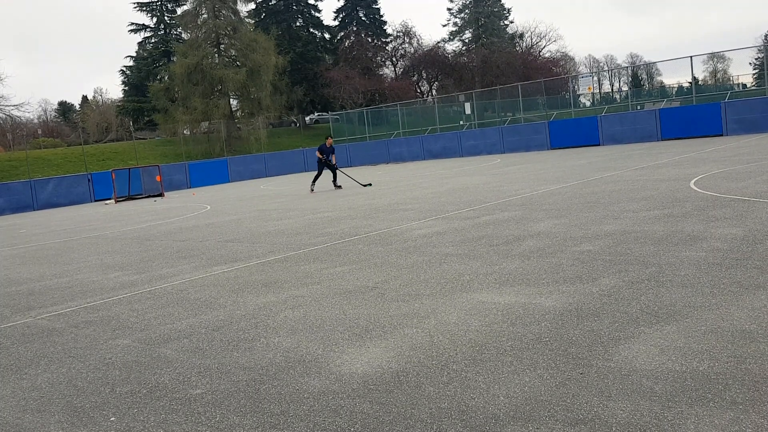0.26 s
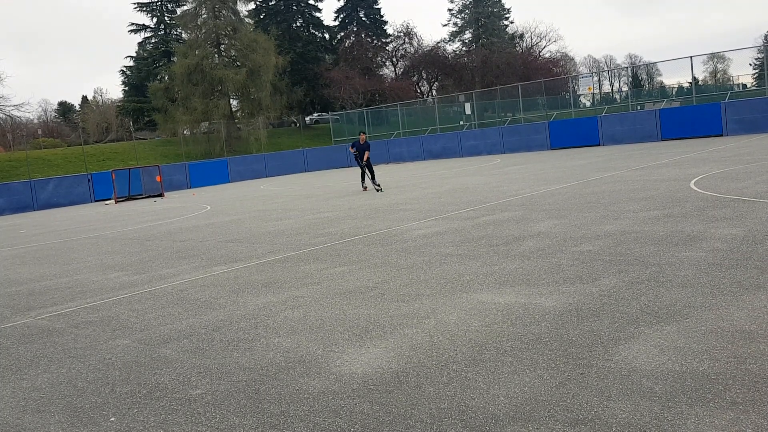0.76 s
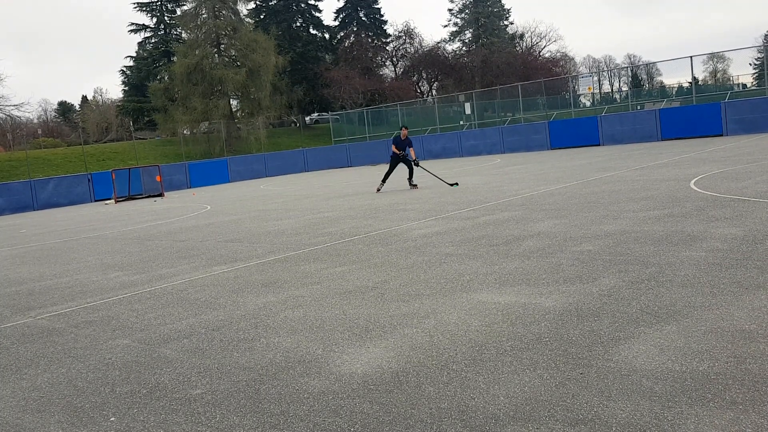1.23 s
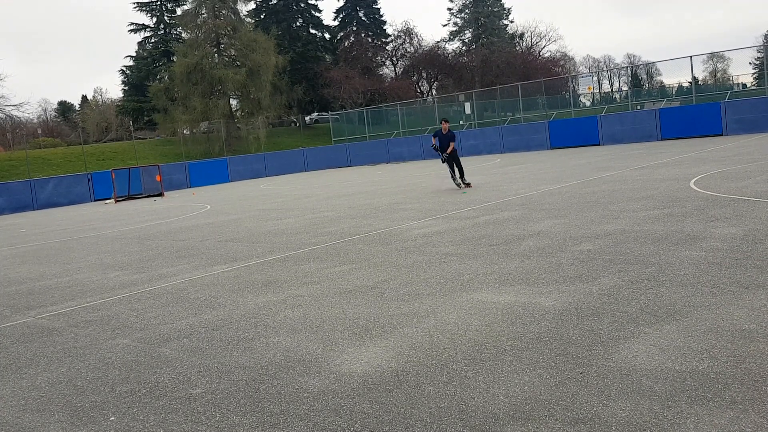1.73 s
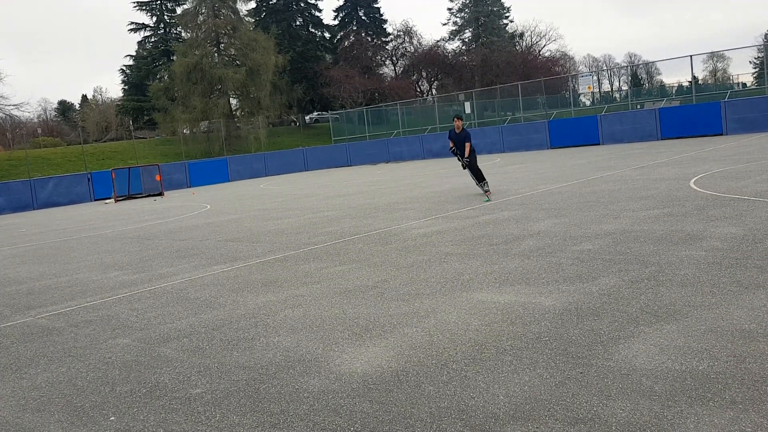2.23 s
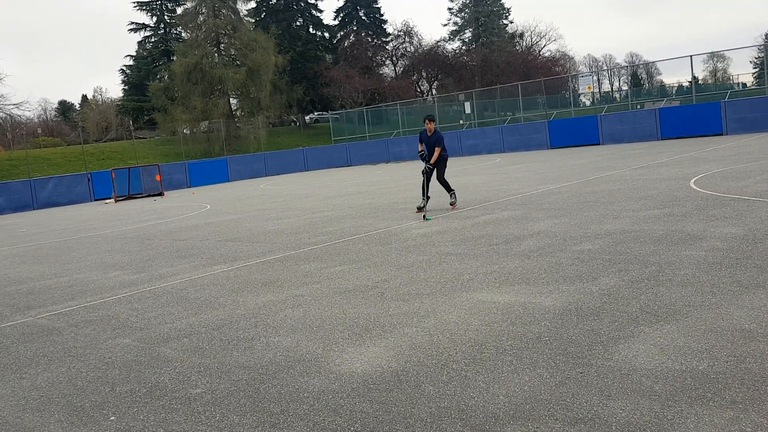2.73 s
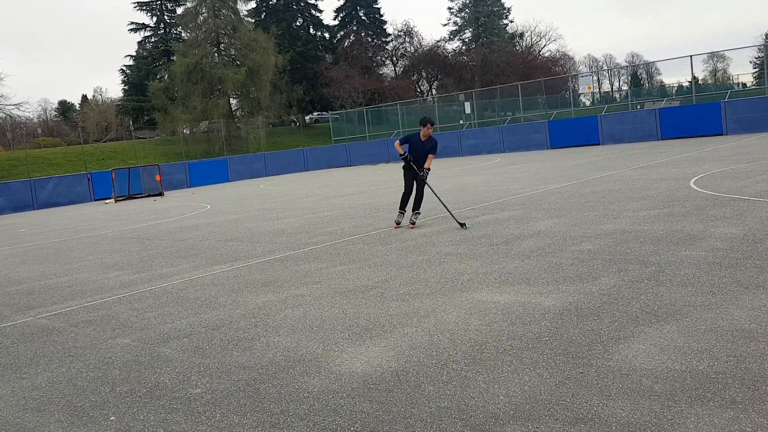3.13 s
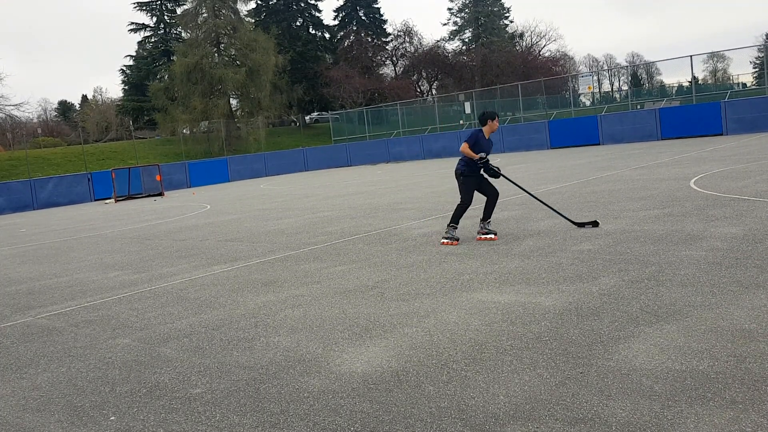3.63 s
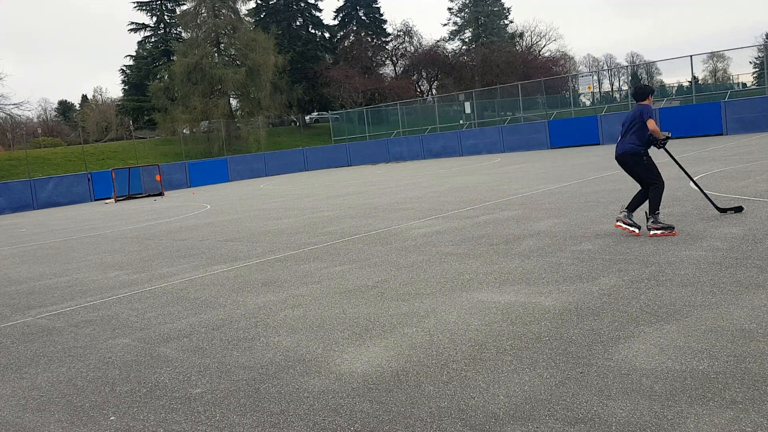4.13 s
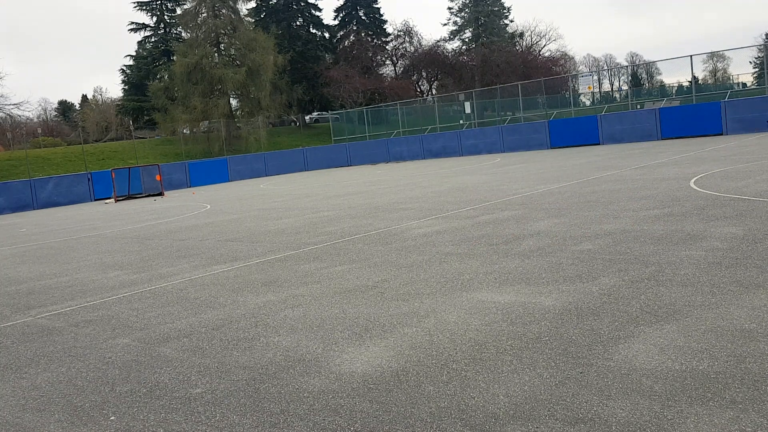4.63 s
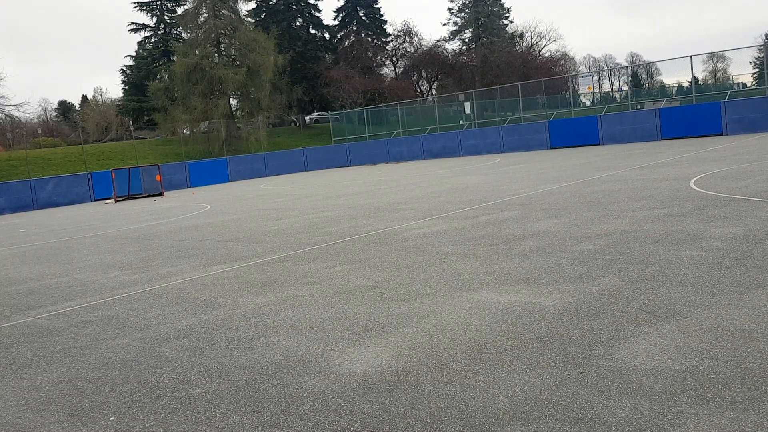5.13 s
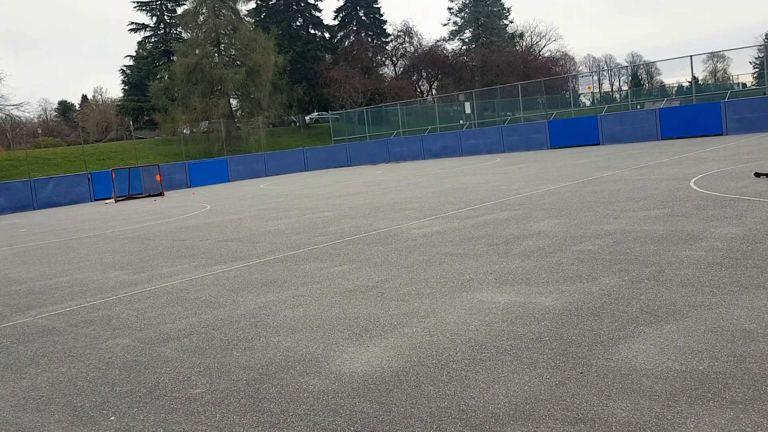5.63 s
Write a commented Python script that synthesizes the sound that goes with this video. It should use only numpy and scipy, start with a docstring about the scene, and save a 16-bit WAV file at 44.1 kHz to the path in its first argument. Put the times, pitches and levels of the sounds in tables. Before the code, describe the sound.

A stationary stereo microphone at an open-air asphalt rink. From 0 to about 1.6 seconds strong wind dominates: low, uneven rumbling and fluttering thumps, different in each ear, sometimes overloading, with small dry ticks on the case. Faint skate strokes scrape behind it, with light knocks and gritty crunches around 1.4 to 1.6. The wind falls back, gusts again more on the right near 2.1, then weakens after 2.4. A dull knock lands near 2.7. From 3 the wheels emerge: grainy roar, airy hiss and scraping pushes, swelling from 3.2 and ringing over coarse stones, brightest around 3.9 to 4.2, with a thin quick rattle as they swing right. They roll on at the right, with lighter wind puffs. Knocks begin near 5.4; a hard, sharp clack with crunchy rattle hits at 5.6, smaller knocks follow to 5.8. A faint distant rush continues throughout, and boards answer the knocks briefly.

```python
"""Outdoor asphalt rink: a hockey player on inline skates curves past a camera on its right.
Wheels roar, ring, scrape and hiss as noise of stone impacts; taps on one narrow mode make a thin rattle.
Skates and stick knock on the ground as damped modes; noise bursts make crunches and the hardest knock's rattle.
The boards answer faintly. Wind buffets both microphone ports as shaped noise and thumps; light ticks,
perhaps drizzle, ring the case. A steady distant rush of trees and town lies behind."""
import sys
import numpy as np
from scipy import signal
from scipy.fft import rfft, irfft, next_fast_len
from scipy.io import wavfile
from scipy.ndimage import uniform_filter1d, map_coordinates

SR = 44100
rng = np.random.default_rng(int(sys.argv[2]) if len(sys.argv) > 2 else 0)


def to_wav(s):
    """Save 16-bit WAV."""
    ch = np.atleast_2d(s).T  # columns
    pcm = np.round(np.clip(ch, -1, 1) * 32767)  # PCM
    wavfile.write(sys.argv[1], SR, pcm.astype(np.int16))


N = 259160

# Skater's path. Each row: time in seconds, bearing in degrees to the right, distance in metres.
SKATER_PATH = [(0, -9, 5.8), (1.3, 5.5, 6.9), (2.1, 20.5, 6.3), (2.8, 8, 4.3), (3.45, 7.5, 3.2),
               (3.85, 17, 5.2), (4.02, 31, 4.1), (4.3, 48.5, 4.4), (4.6, 62, 4.8), (5.25, 81, 5.1),
               (5.55, 63, 3.9), (5.88, 67, 7.1)]
# Dull roar of wheels on asphalt, also the dull part of a crunch. Each row: Hz, relative density in dB.
ROAR_SPECTRUM = [(100, -39), (300, -1.5), (550, 2), (900, -0.5), (1350, 2), (1800, -1.5), (2500, -1.5),
                 (3100, -14), (4200, -17), (9000, -31.5)]
# Modes of the camera's case. Each row: nominal Hz, relative level in dB, t60 in seconds.
CASE_MODES = [(2720, -3.5, .012), (3750, -9, .026), (4740, -8, .014), (5270, -9, .012), (7610, -8, .012),
              (8500, -5, .008), (8850, -4, .009), (11900, -9, .004), (12750, -4, .006)]


def wheels():
    """The ring swells and jolts on its own curve, sideways pushes scrape, load and scrape feed the roar."""
    # Level of the fine hiss. Each row: time in seconds, level in dB.
    hiss_level = [(0, -70), (1.3, -68.5), (1.55, -55), (1.8, -68), (2.86, -65), (3.0, -57.5), (3.6, -55),
                  (4.3, -55.5), (4.65, -61.5), (5.3, -61.5), (5.88, -67)]
    # Brief swells of the hiss as the skater goes by. Each row: centre in seconds, level in dB.
    hiss_swells = [(2.68, -69), (3.08, -49), (3.57, -49.5), (3.77, -53), (4.39, -53.5), (4.5, -55),
                   (4.76, -52.5), (5.08, -56.5)]
    # Level of the wheels' ring. Each row: time in seconds, level in dB before the distance loss.
    ring_level = [(0, -48), (1.35, -54), (1.5, -48), (2.05, -54), (2.2, -50.5), (3.15, -54.5),
                  (3.35, -44.5), (3.58, -39.5), (3.66, -48.5), (3.75, -38.5), (3.92, -40.5), (4.0, -50.5),
                  (4.22, -44.5), (4.3, -55.5), (4.58, -57), (4.66, -61), (5.88, -56)]
    # Coarse stones jolt the wheels into ringing. Each row: centre in seconds, level in dB before the distance loss.
    stone_jolts = [(3.449, -35), (3.557, -38), (3.595, -37), (3.743, -46), (3.898, -30.5), (3.94, -37),
                   (4.097, -29), (4.165, -37), (4.245, -41.5), (4.335, -46), (4.525, -45), (4.915, -45),
                   (5.03, -54), (5.14, -41)]
    # Spectra. Each row: Hz, relative density in dB.
    ring_spectrum = [(900, -26), (1450, -11), (1780, -3.5), (2100, 3), (2300, 1), (2480, -6), (2700, -17),
                     (3400, -28), (6000, -42)]
    scrape_spectrum = [(800, -49), (2400, 5), (3200, 2), (3900, -0.5), (5000, -4.5), (6500, -9),
                       (8500, -17), (10500, -44), (15000, -47)]
    hiss_spectrum = [(3000, -16), (6000, -3.5), (8000, -9.5), (10000, -10), (12600, -2), (14500, -11),
                     (16000, -15)]
    roar_db, scrape_db = -42.5, -57.5  # free gliding, at the reference distance
    loss_db_per_doubling = 5
    roar_from_load, roar_from_slide = 0.34, 0.26
    slip_spread_db, slip_rate_hz = 3, 86
    jolt_width_s, swell_width_s = 0.0069, 0.046

    load, slide = effort()
    slide = slide * amp(slip_spread_db * wobble(slip_rate_hz) - 2.0)  # a pushing skate grips and slips
    uneven_db = 1.9 * wobble(80) + .9 * wobble(14)  # the wheels bear unevenly on the ground

    drive = np.hypot(roar_from_load * load, roar_from_slide * slide)
    roar_grit = grit(ROAR_SPECTRUM, rate_hz=700, size_db=4, smooth=0.89, scattered_db=-1.5)
    roar = amp(roar_db) * np.hypot(1, drive) * roar_grit

    scrape_grit = grit(scrape_spectrum, rate_hz=1400, size_db=3.5, smooth=0.8, scattered_db=-1.5)
    scrape = amp(scrape_db) * np.hypot(1, slide) * scrape_grit

    ring_db, = curves(ring_level)
    jolts = sum(amp(db) * bump(s, jolt_width_s) for s, db in stone_jolts)
    ring_grit = grit(ring_spectrum, rate_hz=970, size_db=0.0, smooth=0.68, scattered_db=4.5)
    ring = np.hypot(amp(ring_db), jolts) * ring_grit * tilt(1.7)

    hiss_db, = curves(hiss_level)
    swells = sum(amp(db) * bump(s, swell_width_s) for s, db in hiss_swells)
    hiss_grit = grit(hiss_spectrum, rate_hz=2600, size_db=4.5, smooth=1.1, scattered_db=-2)
    hiss = np.hypot(amp(hiss_db), swells) * hiss_grit

    rolling = amp(uneven_db) * (roar + scrape) + amp(0.3 * uneven_db) * ring
    return amp(-loss_db_per_doubling * doublings()) * rolling + amp(0.52 * uneven_db) * hiss


def effort():
    """Each stroke builds, holds and lets go; gives the load and the sideways scrape."""
    # Strides and turns. Each row: start in seconds, length in seconds, load on the wheels in dB,
    # sideways scrape in dB, both as pushed before slip and sharing and relative to free gliding.
    strokes = [(0.224, 0.305, 4, 11), (0.83, 0.13, -10, 4.5), (1.368, 0.29, 14, 13),
               (1.648, 0.25, 10.5, 7.5), (1.87, 0.2, 13, 10), (2.61, 0.15, 10.5, 2), (3.185, 0.43, 7, 7),
               (3.618, 0.29, 11, 7), (4.048, 0.17, 4, 4), (4.447, 0.092, 13.5, -6), (4.85, 0.17, 6, -10),
               (5.482, 0.12, -3, 12), (5.595, 0.096, -3, 11), (5.684, 0.2, -1, 13)]
    build_share, release_s = 0.36, 0.041  # build-up as a share of the length
    t = np.arange(N) / SR
    load, slide = np.zeros((2, N))
    for s, length_s, load_db, slide_db in strokes:
        build = np.clip((t - s) / (build_share * length_s), 0, 1)
        release = np.clip(1 - (t - s - length_s) / release_s, 0, 1)
        load += amp(load_db) * build * release
        slide += amp(slide_db) * build * release
    return load, slide


def grit(spectrum, rate_hz, size_db, smooth, scattered_db):
    """Rolling noise of two skates: stone impacts on a smooth bed, direct and scattered by ground and boards."""
    stance_m = 0.28  # each skate from the skater's centre line
    shape = (4, N)  # two direct skates, two scattered ports
    sizes = amp(np.clip(size_db * rng.standard_normal(shape), -12, 12))
    hits = (rng.random(shape) < rate_hz / SR) * rng.standard_normal(shape) * sizes
    paths = coloured(unit(hits) + smooth * rng.standard_normal(shape), spectrum)
    direct = (at_ports(paths[0], -stance_m) + at_ports(paths[1], stance_m)) / np.sqrt(2)
    _, distance_m = curves(SKATER_PATH)
    # the nearer the skater, the more the direct path wins
    scattered = amp(scattered_db) * np.minimum(distance_m / 6.63, 1) ** 1.9
    return (direct + scattered * paths[2:]) / np.sqrt(1 + scattered ** 2)


def chatter():
    """Quick, uneven taps on one narrow mode make a thin rattle that carries only from near; some stand out."""
    # The clearer taps. Each row: time in seconds (each starts 2 ms earlier), level in dB before the tap gain.
    clear_taps = [(3.951, -38), (3.961, -41), (4.028, -42), (4.049, -43), (4.078, -50), (4.096, -35),
                  (4.129, -41), (4.164, -49), (4.182, -44), (4.212, -41), (4.223, -45), (4.274, -40),
                  (4.556, -47), (4.662, -47), (4.817, -50), (4.829, -52), (4.897, -44), (4.967, -47),
                  (5.052, -50), (5.123, -48)]
    mode_hz, t60_s, taps_per_s = 3720, .022, 70
    flutter_db, loss_db_per_doubling = -64, 12  # level at the reference distance
    tap_gain_db, offset_m = 4.5, .01
    t = np.arange(SR // 10) / SR
    ring = amp(-60 * t / t60_s) * np.sin(2 * np.pi * mode_hz * t) * (1 - np.exp(-t / 0.00066))
    taps = (rng.random(N) < taps_per_s / SR) * rng.standard_normal((2, N))
    flutter = unit(signal.oaconvolve(taps, [ring], axes=1)[:, :N])
    flutter = amp(flutter_db - loss_db_per_doubling * doublings()) * flutter
    clear = np.zeros(N)
    for s, db in clear_taps:
        add(clear, s - .002, amp(db + tap_gain_db) * ring)
    return flutter + at_ports(clear, offset_m)


def knocks():
    """Skates land and the stick's blade clacks on the ground: damped modes with a noise crack."""
    # Each row: start in seconds, level in dB before the overall gain,
    # weight of the dull modes in dB (half of it is applied).
    hard_knocks = [(1.379, -45, 6), (1.528, -29, 2), (2.681, -28, 14), (2.855, -42, -20),
                   (4.094, -29.5, 14), (5.413, -25.5, 5), (5.553, -30, 14), (5.608, -10.5, 9.5),
                   (5.697, -22.5, -20), (5.812, -30, -21)]
    # Modes of a knock on asphalt. Each row: nominal Hz, relative level in dB, t60 in seconds.
    ground_modes = [(236, -19, 0.054), (394, -27, .035), (563, 2, 0.0055), (840, 6.5, 0.0056),
                    (1225, 3.5, 0.01), (1530, -5, 0.011), (2550, -0.5, 0.015), (3400, -3.5, 0.01),
                    (4540, -10.5, 0.013), (5350, -14.5, 0.014), (6360, -10, 0.016), (10300, -20, 0.005)]
    gain_db, dull_below_hz = -4.5, 2000
    track = np.zeros(N)
    for s, db, dull_db in hard_knocks:
        clack = strike(ground_modes, split_hz=dull_below_hz, low_db=dull_db / 2,
                       crack_db=-10.0, crack_t60_s=0.029, scatter_db=2.5)
        add(track, s, amp(db + gain_db) * clack)
    return track


def crunches():
    """Short crunches of grit, and the rattle around the hardest knock: a bright burst over a dull one."""
    # Each row: centre in seconds, bright level in dB, dull part relative to it in dB.
    short_bursts = [(0.213, -40.5, 5), (0.276, -43, 7), (0.285, -39, 8.5), (0.309, -50, -9),
                    (1.134, -42, -9), (1.38, -43.5, 13), (1.44, -46, 10), (1.484, -35.5, -9),
                    (1.514, -42, 3), (1.549, -34.5, -2), (1.596, -57, 0), (1.882, -40.5, -3),
                    (1.953, -40, 6), (1.97, -38.5, 4), (1.982, -40, 3), (1.993, -40, 6.5), (2.669, -49, 15),
                    (2.686, -46, 12.5), (2.73, -43, -5), (2.815, -42.5, -18), (2.855, -40, -15),
                    (3.892, -38, 4), (4.391, -41, -14), (5.571, -48, 3), (5.589, -48, 13), (5.615, -43, 8),
                    (5.645, -45, 8), (5.664, -51, 13), (5.673, -48, 17), (5.869, -40.5, -6)]
    # Bright part. Each row: Hz, relative density in dB.
    bright_spectrum = [(1200, -28), (2500, 6), (5000, -2.5), (8500, -10), (15000, -45)]
    width_s = 0.003
    bright = sum(amp(db) * bump(s, width_s) for s, db, _ in short_bursts)
    dull = sum(amp(db + dull_db) * bump(s, width_s) for s, db, dull_db in short_bursts)
    bright_noise = coloured(rng.standard_normal(N), bright_spectrum)
    dull_noise = coloured(rng.standard_normal(N), ROAR_SPECTRUM)
    return bright * bright_noise + dull * dull_noise


def boards(x):
    """A short diffuse answer from the rink's boards: decaying noise, different at each port."""
    # Each row: Hz, t60 in seconds.
    decay_times = [(200, 0.22), (800, 0.11), (2000, 0.075), (12000, 0.068)]
    hz, t, z = signal.stft(rng.standard_normal((2, SR // 2)), SR, nperseg=256)
    decay = amp(-60 * t / along(decay_times, hz)[:, None])
    tail = signal.istft(z * decay, SR, nperseg=256)[1]
    return signal.fftconvolve(x[None], tail / np.linalg.norm(tail[0]), axes=1)[:, :N]


def wind():
    """Each port has its own turbulence; eddies thump and tear inside a swell; stronger wind reaches higher."""
    # Each row: time in seconds, strength in dB before the trim and lulls, left minus right in dB.
    strength = [(0, -28.5, 4), (0.2, -25.5, 2.5), (0.65, -26, 3), (1.17, -23, 0.5), (1.62, -25, 0),
                (1.66, -33, -6.5), (1.88, -42.5, -14.5), (2.0, -36, -7), (2.08, -30, -4.5),
                (2.22, -34.5, -2.5), (2.35, -31, 0), (2.43, -36, 1.5), (2.55, -37, 0.5), (3.4, -39, 0),
                (4.1, -40.5, -3.5), (4.42, -37, 1), (4.6, -38, -3.5), (4.66, -34.5, 2), (4.72, -34, -1),
                (4.79, -35, 0), (4.92, -39, -2), (5.01, -35, -3), (5.13, -40, 0), (5.22, -36.5, -4),
                (5.3, -39, -3), (5.42, -32, -3), (5.5, -39, -1.5), (5.88, -41, -8.5)]
    # Brief lulls. Each row: centre in seconds, depth in dB.
    brief_lulls = [(0.058, 16.5), (0.314, 2.5), (0.631, 3.5), (0.785, 2), (0.94, 2.5), (0.985, 3.5),
                   (1.069, 8), (1.228, 1.5), (2.5, 6), (2.889, 10), (4.289, 39), (4.71, 17), (4.958, 25),
                   (5.27, 6)]
    # Eddies thumping a port. Each row: centre in seconds, level in dB before the core and swell gains,
    # port (0 left, 1 right), pitch in Hz, tear in dB.
    port_eddies = [(0.14, -11.5, 0, 400, -27), (0.182, -4.5, 0, 298, -38), (0.239, -5, 0, 380, -20),
                   (0.358, -6, 0, 298, -32), (0.403, -3, 0, 324, -27.5), (0.423, 0.5, 0, 416, -33),
                   (0.483, -0.5, 1, 342, -36), (0.501, -15, 0, 400, -35), (0.52, -7.5, 1, 270, -37),
                   (0.555, -12.5, 0, 410, -33), (0.585, -6.5, 0, 347, -25.5), (0.715, -8, 0, 290, -26.5),
                   (0.746, -5.5, 1, 300, -34), (0.842, -14, 1, 250, -34), (0.849, -6, 0, 290, -28),
                   (0.868, -7, 0, 270, -33), (0.892, -4, 0, 338, -24.5), (0.914, -7, 0, 357, -41),
                   (1.012, -2.5, 1, 252, -50), (1.012, -8, 0, 356, -52), (1.035, 0, 0, 380, -39),
                   (1.118, -6, 1, 364, -32), (1.129, -5, 0, 343, -38), (1.15, -11, 0, 320, -37),
                   (1.15, -13, 1, 384, -27.5), (1.183, -13, 0, 370, -30.5), (1.183, -3.5, 1, 340, -26),
                   (1.205, -3.5, 1, 320, -26), (1.273, -15, 0, 330, -41), (1.289, -13, 1, 310, -38),
                   (1.318, -9, 0, 340, -47), (1.326, -12, 1, 330, -48), (1.456, -5.5, 0, 320, -28),
                   (1.505, -6, 1, 430, -27), (1.52, -6.5, 0, 290, -37), (1.567, -6.5, 1, 380, -37),
                   (1.619, -16, 0, 300, -44), (1.715, -20.5, 1, 370, -38), (1.739, -14, 1, 423, -30),
                   (1.773, -15.0, 1, 490, -28), (1.812, -15, 1, 428, -29), (1.844, -15.5, 1, 580, -35),
                   (1.907, -31, 1, 690, -31), (1.931, -22, 1, 530, -34), (1.996, -20.0, 1, 470, -34),
                   (2.03, -13, 1, 250, -29), (2.057, -11, 1, 350, -34), (2.09, -9, 0, 410, -38),
                   (2.092, -13, 1, 302, -39), (2.12, -11.5, 1, 310, -39), (2.158, -13, 1, 320, -35),
                   (2.185, -21, 1, 370, -37), (2.295, -16.5, 1, 520, -37), (2.331, -19, 1, 260, -48),
                   (2.346, -14.5, 0, 290, -40), (4.525, -18, 1, 328, -38), (4.824, -18, 1, 388, -38),
                   (5.021, -16, 1, 268, -50), (5.353, -27, 1, 357, -50), (5.423, -13.5, 1, 440, -32),
                   (5.443, -18, 0, 240, -45)]
    # Spectra of strong wind, weak wind and tearing air. Each row: Hz, relative density in dB.
    gust_spectrum = [(20, -18), (45, -3.5), (80, 0.5), (130, 1.5), (220, -1.5), (350, 0), (480, -4.5),
                     (700, -18.5), (1000, -31.5), (1600, -36.5), (3000, -44.5), (8000, -77)]
    breeze_spectrum = [(20, -19), (45, -3), (80, 0.5), (130, 1), (220, -5.5), (350, -6.5), (500, -15.5),
                       (800, -19), (1500, -23.5), (5000, -58.5)]
    tear_spectrum = [(250, -16), (600, 5.5), (900, 4), (1300, -9.5), (2500, -16), (6000, -62)]
    trim_db, lull_width_s = 2.27, 0.015
    tear_db, tear_power = -4, 1.88  # tear level at 0 dB strength; growth exponent
    core_db = -3.5
    swell_db, swell_width_s, swell_lag_s = -14, 0.0087, 0.002  # the swell peaks just after the core
    tear_width_s = 0.0044

    level_db, pan_db = curves(strength)
    level_db = level_db + trim_db - sum(depth_db * bump(s, lull_width_s) for s, depth_db in brief_lulls)
    power = amp(level_db + np.array([pan_db, -pan_db]) / 2) ** 2
    tearing = amp(tear_db) * np.sqrt(power) ** tear_power
    thumps = np.zeros((2, N))
    t = np.arange(-SR // 100, SR // 100) / SR
    for s, db, port, pitch_hz, eddy_tear_db in port_eddies:
        side = int(round(port)) % 2
        u = np.pi * pitch_hz * t
        power[side] += (amp(db + swell_db) * bump(s + swell_lag_s, swell_width_s)) ** 2
        tearing[side] += amp(eddy_tear_db) * bump(s, tear_width_s)
        core = (1 - 2 * u ** 2) * np.exp(-u ** 2)
        add(thumps[side], s - len(u) / SR / 2, amp(db + core_db) * core)

    force = np.clip((10 * np.log10(power) + 34.87) / 11, 0, 1)  # 0 all breeze, 1 all gust
    gust = coloured(turbulence(), gust_spectrum)
    breeze = coloured(turbulence(), breeze_spectrum)
    air = np.sqrt(force) * gust + np.sqrt(1 - force) * breeze
    buffeting = air * np.sqrt(power) * amp(wobble(15))
    ports = buffeting + tearing * coloured(turbulence(), tear_spectrum) + thumps
    return ports / (1 + (ports / .75) ** 4) ** (1 / 4)  # the hardest gusts overload the microphones


def turbulence():
    """White noise at each port with its own fast level flutter."""
    flutter_db = [1.94 * wobble(55) + 2.6 * wobble(170) for _ in range(2)]
    return rng.standard_normal((2, N)) * amp(flutter_db)


def ticks():
    """The clearer ticks ring the case beside each port."""
    # Each row: start in seconds, level in dB before the overall gain, weight of the low modes in dB.
    clear_ticks = [(0.3063, -33.5, 7), (0.421, -31.5, 0), (0.599, -34.5, -4), (0.7492, -44, 11),
                   (0.82, -24, -7), (0.907, -41, 14), (1.0164, -39, 7), (1.285, -37, -14),
                   (1.3788, -27, -17), (1.535, -33, 2), (1.5506, -33, -5), (1.5963, -35, -4),
                   (1.629, -34, 0), (1.7465, -37, -4), (1.7953, -40, -4), (1.848, -47, 4), (1.98, -42, 13),
                   (2.044, -40, 10), (2.071, -40, 6), (2.344, -41.5, 7.5), (3.745, -36, -18),
                   (4.0272, -31, -5), (4.39, -35.5, 5), (5.756, -32, 8), (5.779, -36, 0)]
    gain_db = -5.5
    track = np.zeros((2, N))
    for s, db, low_db in clear_ticks:
        for port in track:
            tick = strike(CASE_MODES, split_hz=6500, low_db=low_db, crack_db=5, crack_t60_s=0.02, scatter_db=3)
            add(port, s, amp(db + gain_db) * tick)
    return track


def patter():
    """Faint touches follow closely and unevenly, each ringing the case's modes in its own mix."""
    # Each row: time in seconds, level in dB before the trim.
    patter_level = [(0.1, -74), (0.5, -53.5), (1.15, -60), (1.6, -50.5), (2.05, -63), (2.3, -57.5),
                    (2.55, -64), (2.8, -53.5), (3.1, -62), (3.7, -51), (4.4, -58), (5.05, -67), (5.5, -69),
                    (5.8, -55)]
    spread_db, touches_per_s, trim_db = 17, 85, -4.5  # spread from faintest to strongest
    level_db, = curves(patter_level)
    track = np.zeros((2, N))
    for k, (delay, size) in enumerate(rng.random((int(touches_per_s * N / SR), 2))):
        for port in track:
            touch = strike(CASE_MODES, split_hz=10000, low_db=3, crack_db=-2, crack_t60_s=0.028, scatter_db=4)
            add(port, (k + 2 * delay) / touches_per_s, amp(spread_db * size ** 2) * touch)
    return amp(level_db + trim_db) * unit(track)


def park():
    """The steady distant rush of trees and town: shaped noise, mostly common to both ports."""
    # Each row: Hz, relative density in dB.
    rush_spectrum = [(30, -10), (120, 7.5), (300, 8.5), (700, 6.5), (1200, -2.5), (2000, -30), (3500, -20),
                     (8000, -46), (16000, -51)]
    noise = rng.standard_normal(N) + 0.23 * rng.standard_normal((2, N))
    return amp(-53.5) * coloured(noise, rush_spectrum)


def at_ports(x, offset_m):
    """Sound from the right reaches the left port later; the source is offset_m to the right of the skater."""
    port_gap_m, sound_speed_m_s = .089, 343
    bearing_deg, distance_m = curves(SKATER_PATH)
    angle_rad = np.radians(bearing_deg) + offset_m / distance_m
    lag_samples = port_gap_m / sound_speed_m_s * SR * np.sin(angle_rad)
    fine = signal.resample_poly(x, 4, 1)  # 4x oversampled for fractional delays
    return np.array([np.interp(4 * np.arange(N) + 2 * side * lag_samples, np.arange(4 * N), fine)
                     for side in (-1, 1)])


def doublings():
    """Doublings of the skater's distance beyond the reference; negative when nearer."""
    reference_m = 4.03
    _, distance_m = curves(SKATER_PATH)
    return np.log2(distance_m / reference_m)


def strike(modes, split_hz, low_db, crack_db, crack_t60_s, scatter_db):
    """Damped modes, scattered in level and pitch, plus a crack; low_db weights the modes under split_hz."""
    t = np.arange(SR // 22) / SR
    hz, db, t60_s = np.transpose(modes)[:, :, None]
    db = db + low_db * (hz < split_hz) + scatter_db * rng.standard_normal(hz.shape)
    hz = hz * (1 + .012 * rng.standard_normal(hz.shape))
    signs = (-1) ** np.arange(len(modes))[:, None]
    ring = np.sum(signs * amp(db - 60 * t / t60_s) * np.sin(2 * np.pi * hz * t), axis=0)
    crack = uniform_filter1d(rng.standard_normal(len(t)), size=3)
    onset = 1 - np.exp(-t / 0.000067)
    return (ring + amp(crack_db - 60 * t / crack_t60_s) * crack) * onset


def amp(db):
    """Decibels to gain."""
    return 10 ** (np.asarray(db) / 20)


def tilt(left_db):
    """Gains that put the left port left_db above the right."""
    return amp(np.array([[left_db], [-left_db]]) / 2)


def unit(x):
    """Scale to rms 1."""
    return x / np.sqrt(np.mean(x ** 2) + 1e-20)


def along(points, hz):
    """Read (Hz, value) points on a log frequency axis."""
    f, v = np.transpose(points)
    return np.interp(np.log(hz + 1), np.log(f + 1), v)


def curves(rows):
    """One value per sample for each column after the time."""
    s, *cols = np.transpose(rows)
    return [np.interp(np.arange(N) / SR, s, c) for c in cols]


def wobble(rate_hz):
    """A smooth random curve, rate_hz knots a second."""
    knots = rng.standard_normal(int(N * rate_hz / SR) + 4)
    return map_coordinates(knots, [np.arange(N) * rate_hz / SR])


def bump(s, width_s):
    """A bell of height 1 at time s, down to 1/e at width_s either side."""
    u = (np.arange(N) / SR - s) / width_s
    return np.exp(-u * u, out=np.zeros(N), where=np.abs(u) < 5)


def filtered(x, response):
    """x times a response of frequency."""
    m = next_fast_len(N + SR // 2)
    return irfft(rfft(x, m) * response(np.fft.rfftfreq(m, 1 / SR)), m)[..., :N]


def coloured(x, spectrum):
    """x shaped by the given spectrum, at rms 1."""
    return unit(filtered(x, lambda hz: amp(along(spectrum, hz))))


def add(track, s, sound):
    """Mix a short sound in at time s."""
    room = track[..., max(0, round(s * SR)):][..., :sound.shape[-1]]
    room += sound[..., :room.shape[-1]]


def scene():
    """The skater moves through the rink while wind and ticks act on the camera itself."""
    blows = knocks() + crunches()
    answer = amp(-16.5) * boards(blows)
    case = (ticks() + patter()) * tilt(5)
    skater = wheels() + chatter() + at_ports(blows, 0)
    return skater + answer + case + wind() + park()


def record(dry):
    """The ports add narrow resonances, and the camera keeps nothing above its band limit."""
    # Each row: centre in Hz, width in Hz, level in dB.
    port_resonances = [(3720, 130, -14), (5450, 200, -20.5), (7670, 80, -15)]
    top_hz = 15900

    def response(f):
        """Direct sound plus band-pass resonances, cut at the band limit."""
        resonances = sum(amp(db) * 1j * f * width_hz / (hz ** 2 - f ** 2 + 1j * f * width_hz)
                         for hz, width_hz, db in port_resonances)
        return (1 + resonances) * (f < top_hz)

    return filtered(dry, response)


dry = scene()
out = record(dry)
to_wav(out)
```